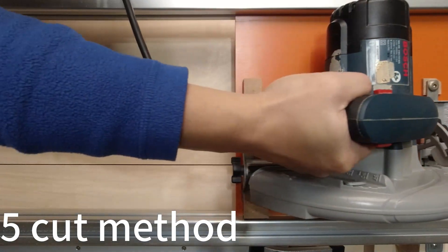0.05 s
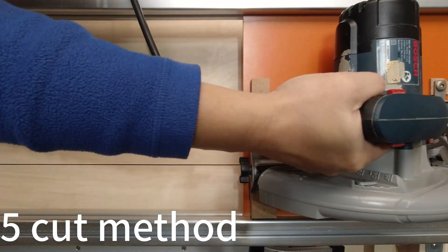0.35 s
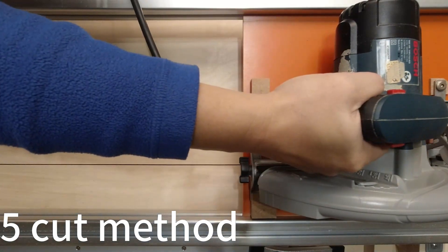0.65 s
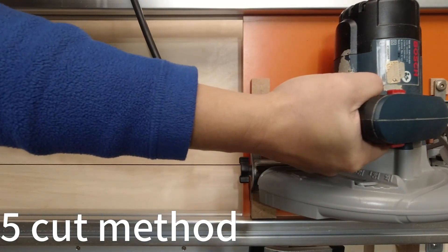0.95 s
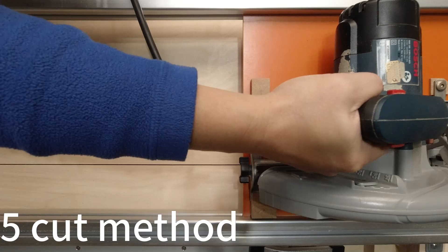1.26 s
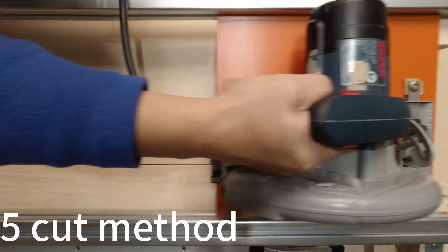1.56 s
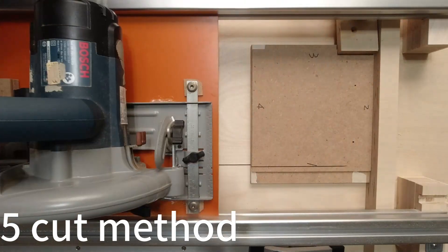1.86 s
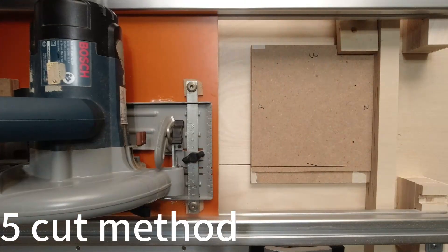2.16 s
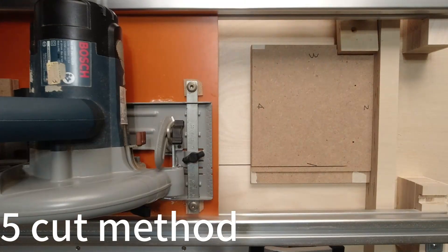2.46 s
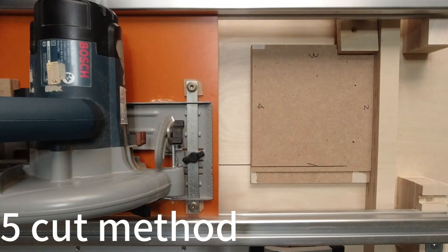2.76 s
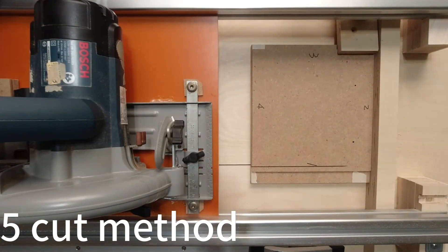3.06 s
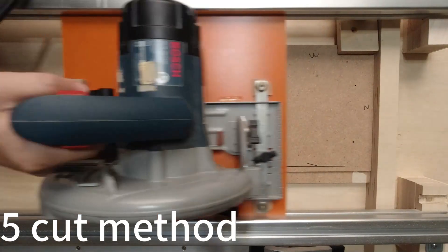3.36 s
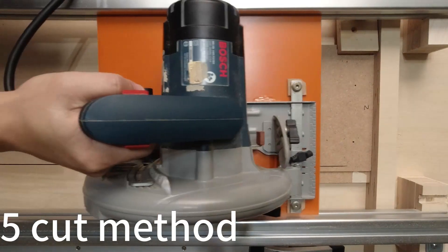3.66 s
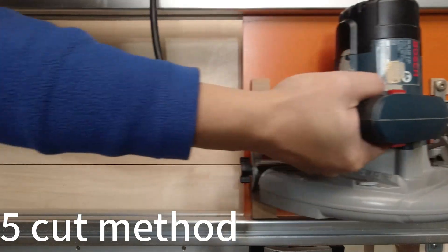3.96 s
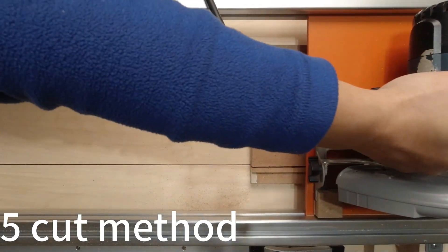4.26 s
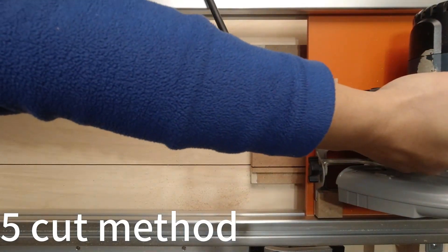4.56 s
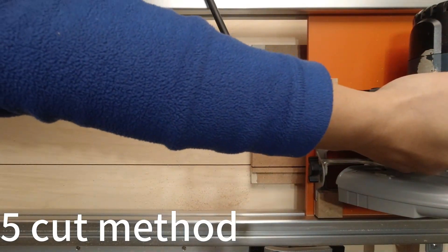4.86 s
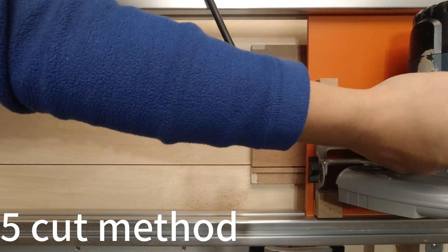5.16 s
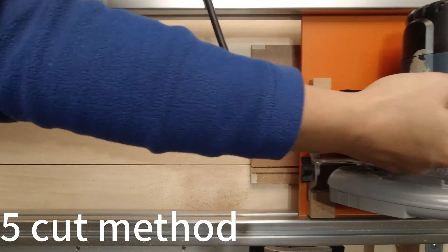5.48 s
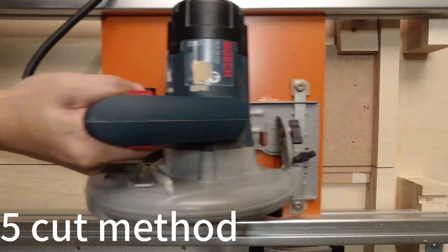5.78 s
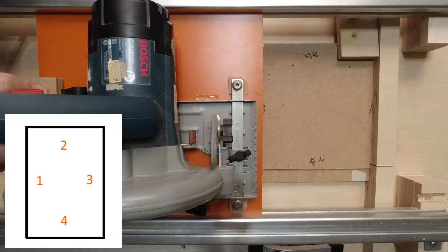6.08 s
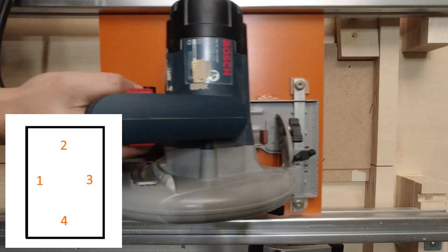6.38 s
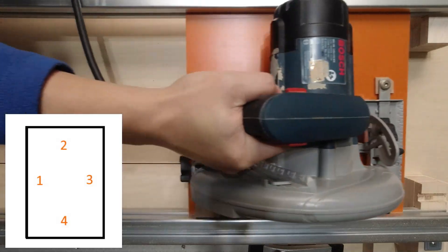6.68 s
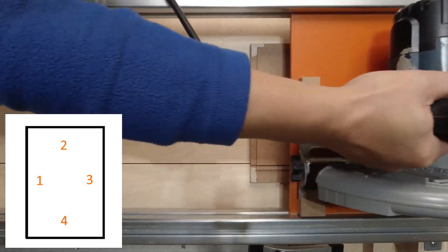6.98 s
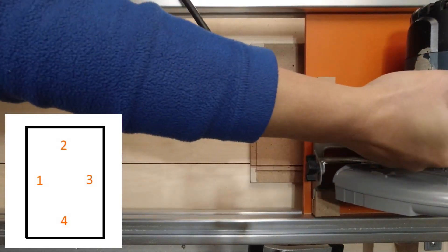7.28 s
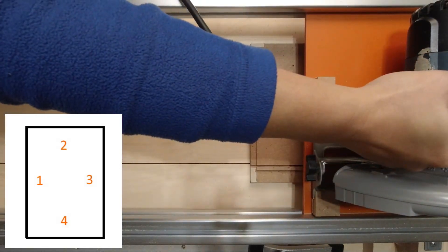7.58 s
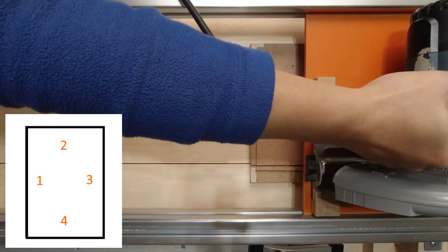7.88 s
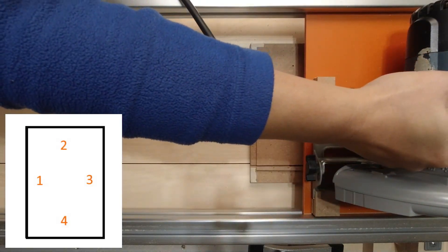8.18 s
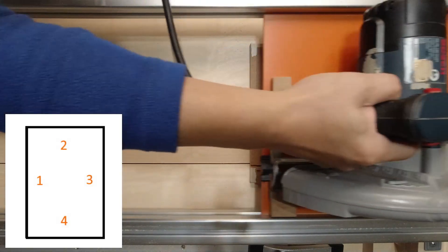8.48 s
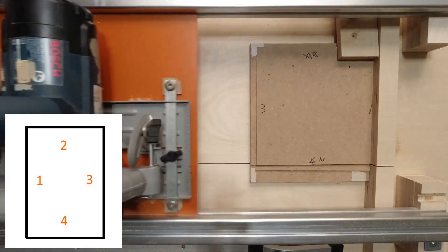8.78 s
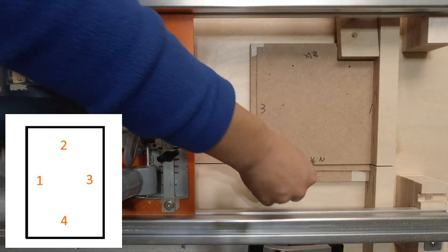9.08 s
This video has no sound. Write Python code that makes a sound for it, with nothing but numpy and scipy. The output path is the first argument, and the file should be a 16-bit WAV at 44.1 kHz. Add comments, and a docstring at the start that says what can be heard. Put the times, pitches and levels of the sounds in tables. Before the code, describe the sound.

A handheld circular saw makes three short, loud cuts in wood, winding down after each, with slides and knocks between.

```python
"""First comes the roar of a hand-held circular saw, close by, in the first of three short cuts on a bench.
Turbulent air makes the roar; as friction brakes the rotor, it gives way to falling whines and gear rattle.
At each of the two restarts the inrush current forces a hard magnetic buzz from the motor.
Between cuts the saw slides back and knocks on its guide track, over the quiet hum of a small workshop."""
import sys
import numpy as np
from scipy import signal
from scipy.fft import rfft, irfft, next_fast_len
from scipy.io import wavfile
from scipy.ndimage import uniform_filter1d

SR = 44100
rng = np.random.default_rng(int(sys.argv[2]) if len(sys.argv) > 2 else 0)


def to_wav(sig):
    """Store sig (one row per channel, or 1-D mono) as 16-bit WAV at the path in sys.argv[1].

    Samples outside -1..1 are clipped; the rate is SR.
    """
    pcm = np.clip(np.atleast_2d(sig), -1, 1) * 32767
    pcm = np.round(pcm).astype(np.int16)
    wavfile.write(sys.argv[1], SR, pcm.T)  # frames by channels


N = 402633
T = np.arange(N) / SR
HZ = np.maximum(np.linspace(0, SR / 2, num=8193), 1)  # frequency axis of the gain curves


def undb(db):
    """Amplitude ratio of a level in decibels."""
    return np.exp(np.asarray(db) * np.log(10) / 20)


def unit(x):
    """Normalisation to rms 1."""
    return x / np.sqrt(np.mean(x ** 2))


def noise():
    """Gaussian white noise."""
    return rng.standard_normal(N)


def walk(rate):
    """Random modulation of rms 1: straight lines between values drawn `rate` times a second."""
    step = max(int(SR / rate), 1)
    return unit(uniform_filter1d(np.repeat(rng.standard_normal(N // step + 1), step)[:N], step))


def grit(rate, spread_db):
    """Shot noise: tiny impacts of uneven size, on average `rate` a second."""
    return unit((rng.random(N) < rate / SR) * noise() * undb(spread_db * np.clip(noise(), -2, 2)))


def spectrum(points, hz=HZ):
    """Spectral envelope: gain from levels interpolated over log frequency."""
    freqs, db = np.transpose(points)
    return undb(np.interp(np.log(np.maximum(hz, 1)), np.log(freqs), db))


def resonances(modes):
    """Modal response: the gain of resonance peaks that add in power."""
    return np.sqrt(sum(undb(db) ** 2 / (1 + (2 * (HZ - hz) / width) ** 2) ** 2
                       for hz, width, db in modes))


def band(lo_hz, hi_hz):
    """Gain of a band-pass with eighth-order skirts."""
    return ((1 + (lo_hz / HZ) ** 16) * (1 + (HZ / hi_hz) ** 16)) ** -.5


def colour(x, gain):
    """Filtering as a product of spectra; the result has rms 1."""
    size = next_fast_len(N, True)
    bin_gain = np.interp(np.arange(size // 2 + 1) * SR / size, HZ, gain)
    return unit(irfft(rfft(x, size) * bin_gain, size)[:N])


def arch(start, length, crest=.5):
    """Envelope of two quarter sines, peaking at the fraction `crest` of its length."""
    return np.sin(np.pi / 2 * np.interp(T, [start, start + length * crest, start + length], [0, 1, 0]))


def swells(rows, waver_rad, flutter_db):
    """Narrow-band tones: half-sine envelopes with random phase and amplitude modulation."""
    out = np.zeros(N)
    drift = waver_rad * walk(60)
    flutter = undb(flutter_db * walk(35))
    for start, length, hz, db in rows:
        out += undb(db) * arch(start, length) * flutter * np.sin(2 * np.pi * hz * T + drift)
    return out


def reflections(x, decay_s, gap_s=.002):
    """Reverberation: convolution with dense, fast-fading echoes from bench and walls, even in colour."""
    t = np.arange(SR // 5) / SR
    echoes = rfft(rng.standard_normal(len(t)) * np.exp(-t / decay_s) * (t > gap_s))
    whitened = echoes / np.sqrt(uniform_filter1d(np.abs(echoes) ** 2, size=12))
    return signal.oaconvolve(x, irfft(whitened, len(t)))[:N]


def pause_age():
    """Time [s] for which the rotor has stood still; 0 while it turns."""
    next_starts = [run[0] for run in RUNS[1:]] + [np.inf]
    return sum((T < start) * np.maximum(T - run[1], 0) for run, start in zip(RUNS, next_starts))


# spectra of the ventilation and of a faint hiss: (frequency [Hz], relative level [dB])
VENTILATION = [(15, -50.5), (25, -22), (184, -4.5), (228, -10), (485, -4), (951, -5.5), (1250, -19.5),
               (1350, -13.5), (1770, -24), (1970, -13), (2320, -20.5), (9410, -31.5), (15700, -52.5)]
HISS = [(700, -15), (1300, 1), (2000, 0), (4000, -1), (7200, -2), (10000, -7), (12200, -4), (15700, -13)]
# machine tones in the room: (frequency [Hz], relative level [dB])
MACHINE_HUM = [(850.6, -75), (958.2, -75.5), (1389, -77), (1922, -76), (5550, -89), (6880, -88.5),
               (7251, -88), (9249, -85.5)]


def workshop(vent_db=-68.8, hum_db=-7, hiss_db=-65, side_db=-8, rumble_db=-86,
             rise_db_per_s=4.3, hiss_onset_s=1.3):
    """Ambient field, as uncorrelated mid and side: noise and wavering tones that creep up in each pause."""
    age = pause_age()
    rise = undb(rise_db_per_s * age)
    hum = np.sqrt(2) * sum(undb(db + 2 * walk(5.5)) * np.sin(2 * np.pi * hz * T + .8 * walk(10))
                           for hz, db in MACHINE_HUM)
    hiss = undb(hiss_db) * age ** 4 / (age ** 4 + hiss_onset_s ** 4) * colour(noise(), spectrum(HISS))
    vent_mid = undb(vent_db) * colour(noise(), spectrum(VENTILATION))
    vent_side = undb(vent_db + side_db) * colour(noise(), spectrum(VENTILATION) / (1 + HZ / 1500))
    rumble = undb(rumble_db) * colour(noise(), band(25, 130))
    return rise * (vent_mid + undb(hum_db) * hum) + hiss, rise * (vent_side + rumble)


# low tones in the room: (time [s], duration [s], frequency [Hz], level [dB])
DRONES = [(1.04, .2, 400, -65), (1.6, 0.85, 194.6, -74.5), (2.9, 1, 201, -66), (4.95, 0.76, 187, -67)]


def room_drones():
    """Slow amplitude modulation: low, nearly pure tones swell and fade."""
    return swells(DRONES, waver_rad=.4, flutter_db=1.5)


# brief ringing of metal, and short flares of gear mesh tones through the case modes while the rotor coasts:
# (time [s], duration [s], frequency [Hz], level [dB])
RINGS = [(1.03, 0.43, 2010, -58.5), (1.83, .1, 1340, -59), (3.355, 0.057, 1280, -42.5),
         (4.98, 0.51, 1170, -56.5), (4.99, 0.07, 4900, -37), (5.08, 0.07, 3700, -33),
         (5.2, 0.045, 2460, -49), (5.215, .05, 3750, -42), (5.905, 0.055, 1350, -54.5),
         (7.97, 0.4, 1148, -56.5), (8.09, 0.055, 3000, -51), (8.755, 0.076, 1326, -56.5)]


def metal_rings():
    """Brief unsteady ringing: metal parts ring, and gear mesh tones flare as they cross the case modes."""
    return swells(RINGS, waver_rad=2.4, flutter_db=3.5)


# pushes along the track, and short hard scrapes: (time [s], duration [s], level [dB])
SLIDES = [(1.575, .145, -60), (1.68, .13, -67), (1.8, .12, -63), (5.48, .55, -69), (5.59, .25, -59),
          (8.43, .7, -69), (8.51, .21, -58.5), (8.68, .165, -59.5)]
SCRAPES = [(3.357, .056, -41), (3.395, 0.046, -45.5), (6.08, 0.13, -58), (3.5, .14, -63)]
# spectrum of the base plate on the track: (frequency [Hz], relative level [dB])
CONTACT = [(180, -38.5), (300, -7), (545, -21.5), (687, -12), (1400, -2), (1600, -9.5), (2340, -8.5),
           (2630, -11.5), (3050, -12), (3840, -9.5), (4530, -14.5), (5720, -13), (6110, -16),
           (10200, -18.5), (15700, -23)]
# modes of the base plate: (frequency [Hz], bandwidth [Hz], relative level [dB])
PLATE_MODES = [(1374, 140, -6), (3120, 48, -8), (3800, 100, -5.5), (4740, 54, -16.5), (5330, 63, -13.5),
               (5830, 140, -17), (6920, 43, -17)]


def sliding(treble_db=-8.5):
    """Sliding friction: the base plate slips unevenly on the dusty track; hard pushes excite its modes."""
    rub = (noise() + .52 * grit(rate=1200, spread_db=3)) * undb(1.4 * walk(70))
    contact = spectrum(CONTACT)
    body = colour(rub, contact * band(500, 5000))
    treble = undb(treble_db) * colour(rub, contact * band(5500, 16000))
    ringing = colour(rub, resonances(PLATE_MODES) + contact)
    travel = sum(undb(db) * arch(start, length, crest=.62) for start, length, db in SLIDES)
    push = sum(undb(db) * arch(start, length) for start, length, db in SCRAPES)
    return travel * (body + treble) + push * ringing


# knocks and latch clicks: (time [s], thud level [dB], thud frequency [Hz], click level [dB])
KNOCKS = [(1.552, -58, 581, -59.5), (2.7, -51, 1200, -58), (2.742, -45, 1240, -53), (3.312, -51, 1200, -55),
          (3.491, -33.5, 984, -46), (5.504, -68, 1100, -59), (6.005, -56, 912, -38.5),
          (6.096, -53, 805, -52), (8.438, -50.5, 1310, -55), (8.66, -47, 550, -53)]


def knocks(attack_s=.00045, thud_s=.0045, click_s=.003, tail_s=.015):
    """Damped free vibration: each impact gives a wooden thud and a click from the metal plate."""
    out = np.zeros(N)
    plate = colour(noise(), spectrum(CONTACT) * band(900, 16000) / (1 + HZ / 7000))
    t = np.arange(SR // 10) / SR
    attack = 1 - np.exp(-t / attack_s)
    for start, thud_db, hz, click_db in KNOCKS:
        span = slice(int(start * SR), int(start * SR) + len(t))
        thud = np.sin(2 * np.pi * hz * t) * np.exp(-t / thud_s)
        click = plate[span] * (np.exp(-t / click_s) + .1 * np.exp(-t / tail_s))
        out[span] += attack * (undb(thud_db) * thud + undb(click_db) * click)
    return out


# starting kicks of the motor: (time [s], level [dB], hold [s], decay time [s])
KICKS = [(3.632, -17.3, 0.03, 0.026), (6.155, -15.3, 0.027, 0.019)]
# spectrum of a kick: (frequency [Hz], relative level [dB])
KICK_SPECTRUM = [(150, -60), (300, -25), (454, -12), (720, -19), (972, -9), (1200, -19), (1420, -8),
                 (1600, -16), (2150, -14), (2400, -4), (2630, -10), (2880, -3), (3300, -8), (3840, 2.5),
                 (4610, -7.5), (15700, -22)]


def starting_kicks(buzz_hz=479, hum_db=-44, rattle_gain=.65, attack_s=.008, inrush_s=.1):
    """Magnetic forcing: the inrush current shakes the motor into a hard buzz that leaves a brief hum."""
    cycles = buzz_hz * T + .02 * walk(200)
    period = np.arange(513) / 512
    # 32 equal harmonics; quadratic phases spread their energy over the period
    waveform = sum(np.cos(2 * np.pi * (k * period + k * k / 24)) for k in range(1, 33))
    buzz = unit(np.interp(cycles % 1, period, waveform)) * undb(1.5 * walk(160))
    rattle = colour(noise() * (1 + .6 * np.cos(2 * np.pi * cycles)), band(900, 16000))
    envelope = np.zeros(N)
    for start, db, hold, decay in KICKS:
        attack = np.sqrt(np.clip((T - start) / attack_s, 0, 1))
        envelope += undb(db) * attack * np.exp(-np.maximum(T - start - hold, 0) / decay)
    current = sum((T > start) * np.exp(-np.abs(T - start) / inrush_s) for start, *_ in KICKS)
    hum = undb(hum_db) * current * (np.sin(2 * np.pi * cycles) + .6 * np.sin(4 * np.pi * cycles))
    return envelope * colour(buzz + rattle_gain * rattle, spectrum(KICK_SPECTRUM)) + hum


# runs of the motor: (start time [s], time at rest [s], gear gain [dB], gear treble gain [dB])
RUNS = [(-.8, 1.493, -38.5, -8), (3.633, 5.474, -37.7, -6), (6.156, 8.4, -39.3, -9.5)]
# rotor speed held under load: (time [s], speed [Hz])
LOADED_SPEED = [(.18, 305.3), (.25, 310), (.3, 303), (3.7, 305), (4.0, 303), (4.11, 284), (4.25, 302),
                (6.4, 309), (6.65, 306), (6.95, 302), (7.15, 305)]
FULL_SPEED_HZ = 305


def rotor_speed(run_up_s=.085, drag_hz=245, friction_hz_per_s=180):
    """Rotor dynamics: exponential run-up, then braking by dry friction and fan drag, equal at drag_hz."""
    held = np.interp(T, *np.transpose(LOADED_SPEED))
    speed = np.zeros(N)
    for start, rest, *_ in RUNS:
        rise = held * (1 - np.exp(-np.maximum(T - start, 0) / run_up_s))
        # constant friction plus square-law drag gives a tangent curve
        coast = drag_hz * np.tan(np.clip((rest - T) * friction_hz_per_s / drag_hz, 0, 1))
        speed += np.minimum(rise, coast)
    return speed


def rotor_orders(orders, turns, blur_rad, flutter_db):
    """Rotational orders: unsteady partials at multiples of rotor speed, from (order, level [dB], gain)."""
    out = np.zeros(N)
    for order, db, gain in orders:
        amplitude = undb(db + flutter_db * walk(45)) * gain
        out += amplitude * np.sin(2 * np.pi * order * turns + blur_rad * walk(260))
    return np.sqrt(2) * out


# tones of fan and shaft: (order [per turn], level at 250 Hz rotor speed before radiation [dB], exponent)
FAN_ORDERS = [(1.075, -52.5, 2.1), (2.15, -59, 1.4), (3, -56.5, 2.1), (6, -40.5, 1.9), (7, -47, 6.5),
              (8, -46.5, 6.2)]
# radiation efficiency of the housing: (frequency [Hz], gain [dB])
RADIATION = [(165, -24), (200, -2), (275, 0), (320, -12.5), (560, -15.5), (660, -6.5), (900, -5),
             (1090, -12), (1200, 2.5), (1310, 15), (1420, 5), (1530, -10), (1720, 0.5), (1830, -7),
             (1950, 2.5), (2200, -7.5)]


def motor_whines(speed, turns, powered_fan_db=-12, labour_db=-42.5, slots_db=-33):
    """Periodic forcing: armature slots and the labouring motor sing under power, the fan when coasting."""
    coasting = uniform_filter1d(1. * (np.gradient(speed) * SR < -175), size=3000)  # slowing by >175 Hz/s
    powered = 1 - coasting
    labouring = np.clip((FULL_SPEED_HZ - speed) / 20, 0, 1)
    turning = np.clip((speed - 85) / 25, 0, 1)
    fan_orders = [(order, db, spectrum(RADIATION, order * speed) * (speed / 250) ** exponent)
                  for order, db, exponent in FAN_ORDERS]
    fan = rotor_orders(fan_orders, turns, blur_rad=.15, flutter_db=2)
    pace = speed / FULL_SPEED_HZ
    motor_orders = [(12, slots_db, pace ** 8), (6, labour_db, labouring * pace ** 4)]
    motor = rotor_orders(motor_orders, turns, blur_rad=.12, flutter_db=2)
    return fan * turning * undb(powered_fan_db * powered) + powered * motor


# gear mesh tones, and thin whistles above them: (order [per turn], relative level [dB])
MESH_ORDERS = [(30, -3.5), (47, -3), (60, 1), (70, -5), (141, -2.5)]
WHISTLE_ORDERS = [(70, -25.5), (141, -18.5), (282, -24)]
# spectrum of the gears: (frequency [Hz], relative level [dB])
GEAR_SPECTRUM = [(530, -59), (900, -37), (1140, -13), (1400, -15), (2180, -18), (2430, -17.5), (3320, -13),
                 (3830, -1), (4310, -13), (5040, -1.5), (5820, -22.5), (10600, -13), (15700, -25)]
# modes of the gear case: (frequency [Hz], bandwidth [Hz], relative level [dB])
CASE_MODES = [(1133, 180, -15), (1916, 43, -16.5), (2430, 67, -8.5), (3034, 140, -5.5), (3856, 280, 3),
              (5230, 200, -22.5), (6100, 170, -23.5), (8740, 180, -22.5), (10200, 25, -9.5),
              (10600, 120, -11.5), (11040, 71, -8.5), (12200, 140, -17), (13300, 480, -21.5),
              (14000, 170, -18.5)]
# harder rattling of the loose gears while coasting: (time [s], duration [s], added level [dB])
RATTLES = [(4.92, .47, 4)]


def gears(speed, turns, reference_hz=100, seated_hz=200, stall_hz=6, crisp_db=3, torque_db=5, torque_s=.2):
    """Backlash: chattering teeth and rough mesh tones excite the case modes, crisper as the rotor slows."""
    mesh_orders = [(order, db, order * speed < 16000) for order, db in MESH_ORDERS]
    mesh = unit(rotor_orders(mesh_orders, turns, blur_rad=1.3, flutter_db=3))
    chatter = .5 * grit(rate=3500, spread_db=1) + noise() + .3 * mesh
    chatter *= undb(1.4 * walk(140) + walk(22))
    case = undb(-1) * spectrum(GEAR_SPECTRUM) + resonances(CASE_MODES)
    body = colour(chatter, case * band(1000, 6140))
    crispness = undb(crisp_db * np.clip(1 - speed / reference_hz, -.5, 1))
    treble = crispness * colour(chatter, case * band(6700, 16000))
    whistle_hz, whistle_gain = [5500, 11000, 13000, 15480, 17000], [.2, .3, 1, .96, 0]
    whistle_orders = [(order, db, np.interp(order * speed, whistle_hz, whistle_gain))
                      for order, db in WHISTLE_ORDERS]
    whistle = rotor_orders(whistle_orders, turns, blur_rad=1, flutter_db=5.5)
    force = (speed / reference_hz) ** .88 * np.tanh((speed / stall_hz) ** 2)
    force /= np.sqrt(1 + (speed / seated_hz) ** 6)  # at speed, fan drag holds the teeth together
    rattle = undb(sum(db * arch(start, length) for start, length, db in RATTLES))
    out = np.zeros(N)
    for start, rest, db, treble_db in RUNS:
        boost_db = torque_db * np.exp(-np.abs(T - start) / torque_s)  # louder under starting torque
        running = (T > start) * (T < rest)
        out += running * undb(db + boost_db) * (body + undb(treble_db) * treble + whistle)
    return force * rattle * out


# spectra of the air's lowest band and of its upper bands: (frequency [Hz], relative level [dB])
AIR_LOW = [(18, -53), (30, -31), (322, -15), (404, -18.5), (473, -11), (555, -15), (939, -6.5),
           (1410, -1.5), (1740, 5), (2000, -5.5), (2600, -30.5), (4400, -120)]
AIR_HIGH = [(590, -55), (1000, -36), (1120, -23.5), (1410, -18.5), (1740, -11), (2090, -14.5), (2400, -6),
            (2820, -1), (3060, -4), (3680, 2), (5830, -8), (10300, -7.5), (12600, -8), (15700, -10)]
# modes of guard and blade: (frequency [Hz], bandwidth [Hz], relative level [dB])
GUARD_MODES = [(1830, 87, -16), (2426, 76, 3.5), (2760, 130, -6.5), (3700, 60, -9.5), (4290, 150, -6),
               (7470, 120, -17), (12800, 140, -7.5)]
# bands of the roar: (low edge [Hz], high edge [Hz], saturation level [dB], knee speed [Hz], share of bite)
AIR_BANDS = [(170, 1150, -51.2, 200, .4), (1200, 3100, -31.6, 216, .6), (3300, 6300, -28, 226, .9),
             (6600, 16000, -27.9, 250, .4)]
# the blade bites into the board: (time [s], duration [s], added level at full share [dB])
BITES = [(-.2, .65, 2), (3.6, .52, 2.7), (6.22, .9, 3.1)]


def air_roar(speed, turns, buffet_db=-66.5, spark_drive=.85, spark_s=.12):
    """Turbulence: air and chips roar through the guard, brighter with speed, and buffet the microphone."""
    bite_db = sum(db * arch(start, length) for start, length, db in BITES)
    chop = 1 + .16 * np.sin(2 * np.pi * turns)  # once a turn
    rush = (noise() + .35 * grit(rate=4000, spread_db=3)) * chop * undb(.7 * walk(30))
    guard = spectrum(AIR_HIGH) + undb(-7.5) * resonances(GUARD_MODES)
    # the brushes spark and hiss under the starting current
    spark = spark_drive * sum((T > start) * np.exp(-np.abs(T - start) / spark_s) for start, *_ in RUNS)
    buffet = undb(buffet_db) * colour(noise(), band(36, 190)) * (speed / FULL_SPEED_HZ) ** 10
    roar = np.zeros(N)
    for index, (lo_hz, hi_hz, db, knee_hz, share) in enumerate(AIR_BANDS):
        drive = np.hypot((speed / knee_hz) ** 4, spark)
        envelope = undb(db + share * bite_db) * drive / np.hypot(1, drive)
        response = guard if index else spectrum(AIR_LOW)
        roar += envelope * colour(rush, response * band(lo_hz, hi_hz))
    return buffet + roar


def saw():
    """Common excitation: one rotor drives all three; air leads at speed, gear noise as it slows."""
    speed = rotor_speed()
    turns = np.cumsum(speed) / SR
    return air_roar(speed, turns) + gears(speed, turns) + motor_whines(speed, turns)


# stereo width of the echoes: (frequency [Hz], side level relative to mid [dB])
ECHO_WIDTH = [(60, -3), (110, -7), (200, -13), (380, -11), (700, -20), (1290, -27), (2380, -30),
              (4400, -12.5), (8120, -6), (15000, -1)]


def scene():
    """Superposition in mid and side: sources sit straight ahead; echoes and room noise give the width."""
    room_mid, room_side = workshop()
    mid = saw() + starting_kicks() + sliding() + knocks() + metal_rings() + room_drones() + room_mid
    width = spectrum(ECHO_WIDTH, np.arange(N // 2 + 1) * SR / N)
    side = irfft(rfft(reflections(mid, decay_s=.02)) * width, N) + room_side
    mid = mid + undb(-15) * reflections(mid, decay_s=.012)
    return np.array([mid + side, mid - side])


def record(dry):
    """Band limiting: a steep elliptic low-pass removes the treble above 15.8 kHz."""
    return signal.sosfilt(signal.ellip(10, .2, 80, 15800, fs=SR, output="sos"), dry)


dry = scene()
out = record(dry)
to_wav(out)
```